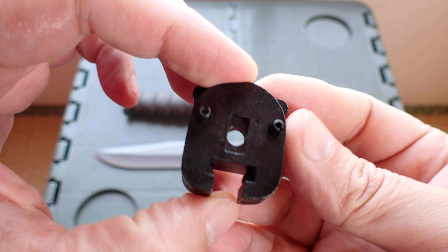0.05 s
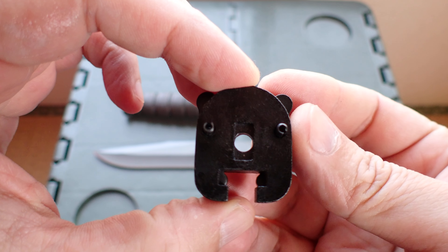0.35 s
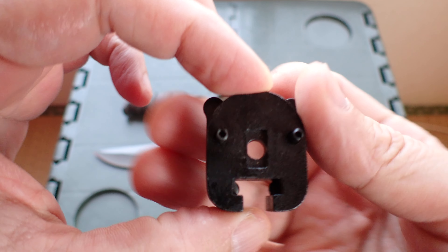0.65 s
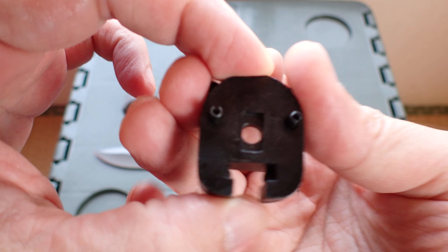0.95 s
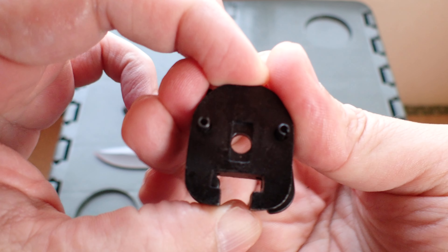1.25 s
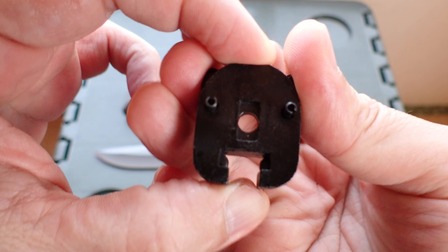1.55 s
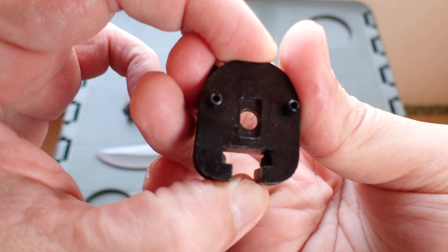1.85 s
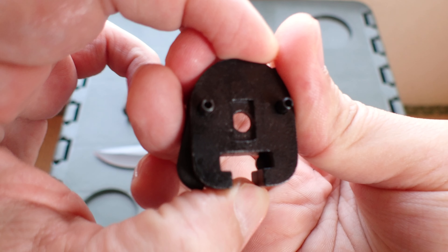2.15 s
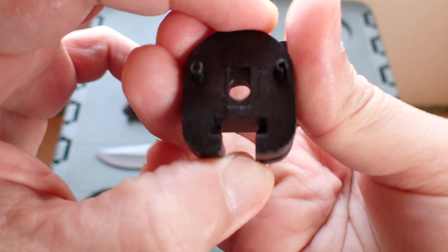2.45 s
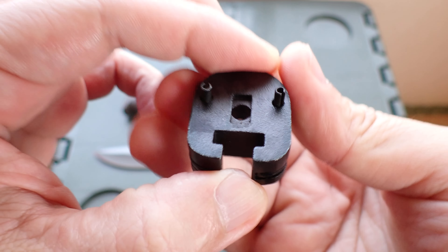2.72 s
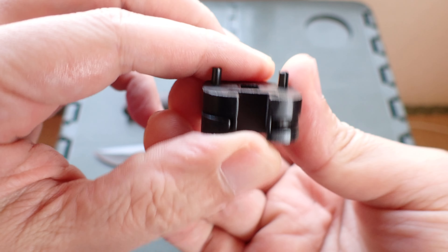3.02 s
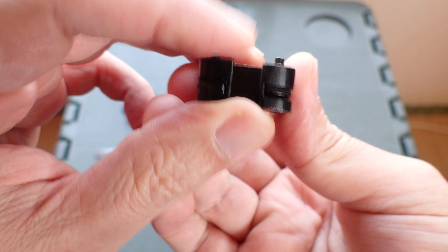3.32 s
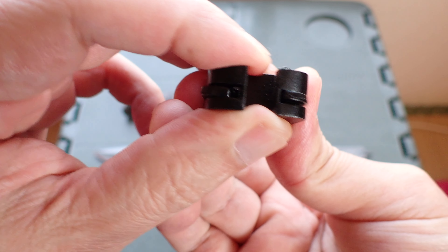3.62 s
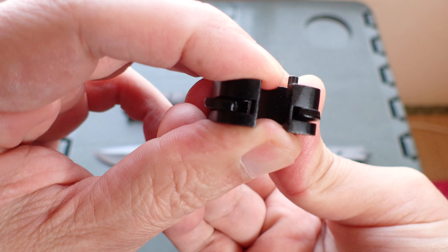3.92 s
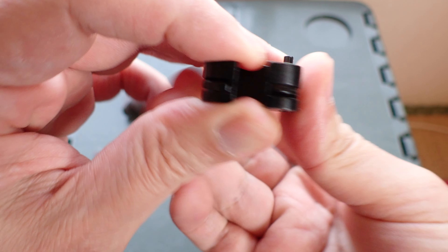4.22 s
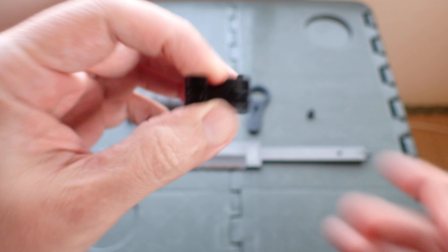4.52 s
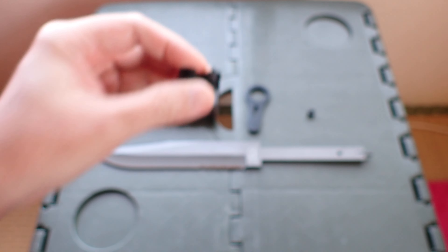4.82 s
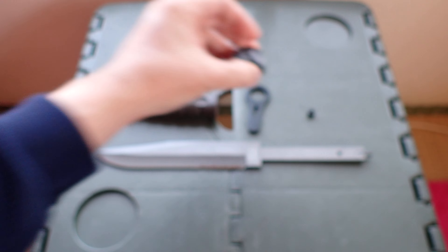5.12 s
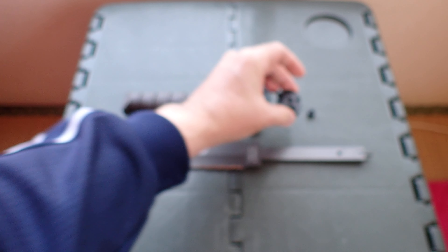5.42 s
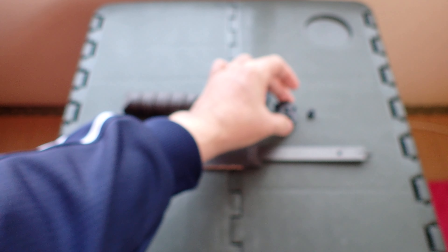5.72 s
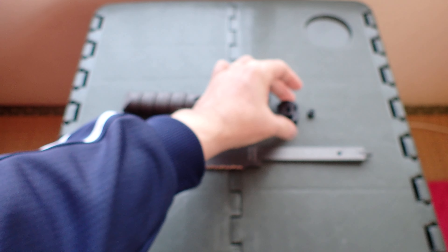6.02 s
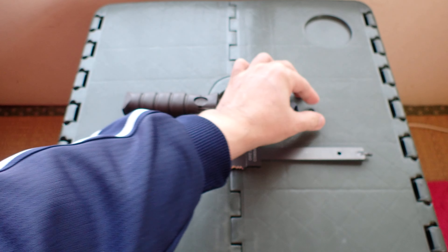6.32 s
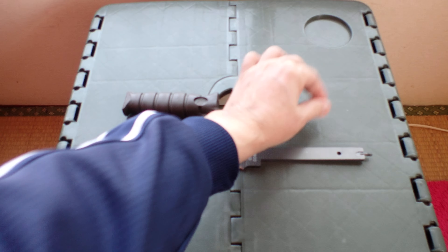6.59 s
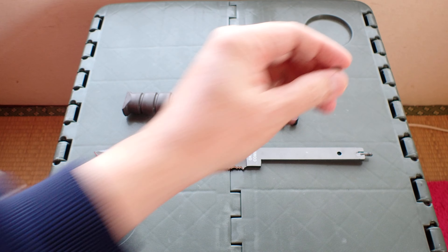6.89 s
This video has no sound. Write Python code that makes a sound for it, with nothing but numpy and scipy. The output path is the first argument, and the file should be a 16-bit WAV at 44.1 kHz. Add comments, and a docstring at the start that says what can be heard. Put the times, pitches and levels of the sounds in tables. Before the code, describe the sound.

In a quiet room with microphone hiss and a camera's faint focus buzz, fingers turn a small metal part close to the microphone. Skin rubs softly while the loose halves clink and snap together. A sleeve then swishes forward and the part is knocked down on a hollow plastic board a little farther off. It chatters briefly, is nudged and scrapes to rest.

```python
"""First comes a quiet room with microphone hiss, and the faint stepping buzz of a camera's focus motor. Close
by, fingers turn a small metal part: the loose halves clink and snap together. A sleeve swishes forward and the
part is knocked down on a hollow plastic board, which rings. The part chatters as it bounces, is nudged twice
and scrapes to rest."""
import sys
import numpy as np
from scipy import signal
from scipy.fft import rfft, irfft
from scipy.io import wavfile

SR = 44100
rng = np.random.default_rng(int(sys.argv[2]) if len(sys.argv) > 2 else 0)


def inscribe(sig):
    """Save sig as 16-bit PCM at rate SR to the path in sys.argv[1].

    A 1-D sig is mono; a 2-D sig holds one channel per row.
    Samples are clipped to [-1, 1] before scaling.
    """
    pcm = np.round(np.clip(np.atleast_2d(sig).T, -1, 1) * 32767)
    wavfile.write(sys.argv[1], SR, pcm.astype(np.int16))


N = 306477

# the board's natural tones: pitch_hz, level_db, ring_s (time to fade by 60 dB)
BOARD_TONES = [(236.5, 6.5, 0.11), (290.7, -3.5, 0.34), (342, -2, .17), (417, -11, 0.1),
               (569.5, -11.5, 0.2), (624, -9.5, 0.19), (660, -10, 0.13), (705, -11.5, 0.07),
               (860, -11.5, 0.068), (1028, -1, 0.054), (1113, -7, 0.043), (1236, -18, 0.091),
               (1340, -17, 0.12), (1390, -15, 0.11), (1840, -16, 0.022), (2140, -26, 0.047),
               (2910, -14.5, 0.081), (3290, -4, 0.01), (4190, -7, 0.019)]


def amp(db):
    """Turns decibels into a gain."""
    return 10 ** (np.asarray(db) / 20)


def unit(x):
    """Scales a sound to an average (rms) level of 1."""
    return x / np.sqrt(np.mean(x ** 2) + 1e-20)


def read(points, hz):
    """Reads between a table's rows on a musical pitch scale."""
    f, value = np.transpose(points)
    return np.interp(np.log(hz + 1), np.log(f + 1), value)


def add(mix, start_s, sound):
    """Mixes a sound in at its start time."""
    part = mix[..., round(start_s * SR):][..., :sound.shape[-1]]
    part += sound[..., :part.shape[-1]]


def colour(x, gain):
    """Turns each frequency up or down by gain(hz)."""
    return irfft(rfft(x) * gain(np.fft.rfftfreq(x.shape[-1], 1 / SR)), x.shape[-1])


def cut(x, hz, kind, order=2):
    """Keeps the "low", "high" or "band" part of a sound."""
    return signal.sosfilt(signal.butter(order, hz, kind, fs=SR, output="sos"), x)


def band(x, low_hz, high_hz):
    """Gently fades what lies below low_hz and above high_hz."""
    return cut(cut(x, low_hz, "high"), high_hz, "low")


def ring(hz, ring_s, t):
    """One fading tone."""
    return np.sin(2 * np.pi * hz * t) * 1000 ** (-t / ring_s)


def burst(fade_s, t):
    """Fading noise, different left and right."""
    return rng.standard_normal((2, len(t))) * 1000 ** (-t / fade_s)


def pan(left_db):
    """Two gains that make the left side louder by left_db."""
    return amp(np.array([[.5], [-.5]]) * left_db)


def background(rumble_db=-51, hiss_db=-55.1):
    """The room rumbles softly and the two microphones add their own hiss."""
    # the tone colour of each noise: pitch_hz, level_db
    rumble_shape = [(12, -56), (20, -8), (32, -23), (51, -8), (75, -3.5), (181, -3), (212, -3), (353, -6),
                    (413, -7), (513, -8.5), (601, -10), (823, -10.5), (2200, -24.5), (2860, -33.5),
                    (4840, -120)]
    hiss_shape = [(1500, -30), (2300, -16), (3400, -13.5), (3980, -19), (4300, -14), (4900, -13),
                  (5500, -6.5), (6600, -6.5), (7700, 0), (8600, -3), (9200, -11), (10200, -9), (15800, -10)]
    # how alike the two sides are: pitch_hz, likeness (0 to 1)
    likeness = [(30, 0.22), (70, 0.24), (140, 0.3), (300, 0.12), (700, 0.057), (1500, 0.28), (3000, 0.2),
                (8000, 0.073), (15000, 0.03)]
    # how much louder the left side is: pitch_hz, left_db
    balance = [(60, -2.5), (110, 5), (200, 1.5), (380, 4), (700, 1), (1290, 6), (2380, 1), (4400, 5.5),
               (8120, 2), (15000, 2)]
    left, other = rng.standard_normal((2, N))
    shared = lambda f: read(likeness, f)
    right = colour(left, shared) + colour(other, lambda f: np.sqrt(1 - shared(f) ** 2))
    pair = np.array([left, right])
    layer = lambda shape: unit(colour(pair, lambda f: amp(read(shape, f)) * pan(read(balance, f))))
    hiss = layer(hiss_shape)
    return amp(rumble_db) * layer(rumble_shape) + amp(hiss_db) * hiss / np.std(hiss.mean(0))


def focus_motor(steps_per_s=45, step_s=0.025, uneven_db=3.5, weak_db=-4):
    """The lens moves in short steps, every third one stronger, each a soft buzz in its housing."""
    # the motor's runs: start_s, end_s, level_db
    runs = [(0.403, .85, -60), (1.267, 2.72, -59.5), (3.871, 4.38, -58.5), (5.837, 6.36, -59.5),
            (6.702, 6.86, -61.5)]
    # where the housing rings: pitch_hz, width_hz, level_db
    peaks = [(3107, 300, 10.5), (4700, 1800, 2.5)]
    steps = np.zeros(N)
    for start_s, end_s, db in runs:
        for k, time_s in enumerate(np.arange(start_s, end_s, 1 / steps_per_s)):
            weak = k % 3 > 0
            step_db = db + weak * weak_db + uneven_db * rng.standard_normal()
            add(steps, time_s, amp(step_db) * np.hanning(round(step_s * SR)))
    housing = lambda f: sum(amp(db) / (1 + (2 * (f - hz) / width) ** 2) for hz, width, db in peaks)
    return steps * unit(colour(rng.standard_normal((2, N)), housing)) * pan(0.73)


def swish(shape, peak_s, rise_db_per_s, fall_db_per_s, catch_db, catch_hz, likeness):
    """Soft surfaces rub in one swell of noise, catching unevenly."""
    since = np.arange(N) / SR - peak_s
    swell_db = np.minimum(rise_db_per_s * since, -fall_db_per_s * since)
    catching = unit(colour(rng.standard_normal(N), lambda f: np.exp(-(f / catch_hz) ** 2)))
    grain = likeness * rng.standard_normal(N) + (1 - likeness) * rng.standard_normal((2, N))
    rub = unit(colour(grain, lambda f: amp(read(shape, f))))
    return rub * amp(swell_db + catch_db * catching)


def fingertips(level_db=-60):
    """Skin creeps over the metal, loudest while it presses the halves together."""
    # the tone colour of rubbing skin: pitch_hz, level_db
    skin = [(120, 0), (300, 13), (600, 0), (1300, 0), (2400, -14), (3700, -14), (4600, 0), (7500, -3),
            (10000, -12), (15000, -18)]
    rub = swish(skin, peak_s=1.6, rise_db_per_s=14, fall_db_per_s=14,
                catch_db=3, catch_hz=60, likeness=.55)
    return amp(level_db) * rub * pan(3)


def clinks(crack_s=0.088, bounce_s=0.001044, bounce_db=-5):
    """The halves touch twice in a flash and ring; the spot struck decides which tones stand out."""
    # the part's natural tones: pitch_hz, ring_s, rim_db, corner_db, face_db, pin_db
    metal_tones = [(2160, 0.26, -42, -35, -40, -6), (2880, 0.075, -16, -24, -35, -22),
                   (4190, 0.15, -30, -32, -27, -6), (4440, 0.058, 3, -20, -16, -10),
                   (4680, 0.1, -17, -13, -8, 1), (4940, 0.11, -24, -21, 1, -7),
                   (5170, 0.46, -38, -30, -2, -26), (7740, 0.1, 5, -8, 2, -6), (8190, .1, -24, -24, 4, -14),
                   (8670, 0.087, -28, -26, 0, -20), (10080, 0.05, -24, -1, -40, -27),
                   (10610, 0.08, -13, -27, -32, -20), (11435, 0.42, -18, -24, -33, -32),
                   (13050, 0.14, -21, -25, -19, -30), (13500, 0.13, -24, -14, -31, -26),
                   (15000, .045, -18, -10, -26, -20)]
    # the names of those four spots, in the same order
    spots = ["rim", "corner", "face", "pin"]
    # the touches: start_s, level_db, spot, ring_factor, crack_db
    touches = [(1.039, -42, "rim", 0.8, -4), (1.160, -41, "face", 0.39, -8),
               (1.9594, -29.5, "corner", 1, -12), (1.992, -20.5, "rim", 0.78, -11.5),
               (2.221, -39, "pin", 1, -9), (4.2025, -29.5, "face", 0.7, -11)]
    out, t = np.zeros((2, N)), np.arange(SR // 3) / SR
    for start_s, db, spot, ring_factor, crack_db in touches:
        tone = sum(amp(spot_db[spots.index(spot)]) * ring(hz, ring_s * ring_factor, t)
                   for hz, ring_s, *spot_db in metal_tones)
        crack = amp(crack_db) * band(burst(crack_s, t), 3800, 10700)
        add(out, start_s, amp(db) * (tone / abs(tone).max() + crack))
        tick = band(burst(0.027, t), 7800, 6900)
        add(out, start_s + bounce_s, amp(db + bounce_db) * tick)
    return cut(out, 2600, "high") * pan(4.3)  # the clinks keep little below 2.6 kHz


def snaps(low_ring_s=0.015, high_ring_s=0.0085, crack_db=-9, crack_s=0.011, after_s=0.45):
    """Pinched metal slips and stops dead: two very short tones, a crack and a faint after-ring."""
    # slips choked by the fingers: start_s, level_db, low_hz, high_hz, high_db, ring_factor, after_db
    slips = [(1.0407, -34, 1860, 7600, 12, 2.7, -18), (1.496, -38, 4800, 7800, 4, .7, -14),
             (1.513, -38, 4700, 7800, -6, .8, -19), (1.518, -24, 5230, 7700, 4, 0.59, -29),
             (1.556, -40, 4940, 7800, 6, 1.5, -16), (2.4364, -14.5, 4800, 14100, 10.5, 0.32, -33),
             (3.498, -49, 4470, 7800, -10, 1.5, -25), (4.1456, -21.5, 4400, 8400, 9, 0.83, -26),
             (4.147, -23.5, 4130, 7540, 29, 0.58, -30)]
    out, t = np.zeros((2, N)), np.arange(SR // 6) / SR
    for start_s, db, low_hz, high_hz, high_db, ring_factor, after_db in slips:
        tone = ring(low_hz, low_ring_s * ring_factor, t)
        tone += amp(high_db) * ring(high_hz, high_ring_s * ring_factor, t)
        crack = amp(crack_db) * band(burst(crack_s, t), 4000, 12000)
        after_ring = amp(after_db) * band(burst(after_s, t), 3200, 10600)
        add(out, start_s, amp(db) * (tone / abs(tone).max() + crack + after_ring))
    return cut(out, 2000, "high") * pan(3.7)


def sleeve(level_db=-51):
    """Cloth rubs on cloth as the arm reaches out, loudest when the arm is fastest."""
    # the tone colour of rubbing cloth: pitch_hz, level_db
    cloth = [(150, -3), (400, 6.5), (850, -1), (1400, -1.5), (2300, -9.5), (3800, -9.5), (4700, -0.5),
             (6800, -4.5), (8200, -5), (15000, -32)]
    rub = swish(cloth, peak_s=4.76, rise_db_per_s=31, fall_db_per_s=16.5,
                catch_db=-1.5, catch_hz=25, likeness=0.53)
    return amp(level_db) * rub * pan(2.9)


def bounces(chatter_s, swing_s=.00418, uneven_s=0.00043,
            drop_db=-7.5, fade_db_per_s=-25, uneven_db=6.9, soften=0.59):
    """The board throws the part back; it lands two or three swings later, duller and mostly weaker."""
    swings = rng.permuted(np.tile([2, 3], (6, 1)), axis=1).ravel()
    delays = np.cumsum(swing_s * swings + uneven_s * rng.standard_normal(len(swings)))
    levels = drop_db + fade_db_per_s * delays + uneven_db * rng.standard_normal(len(delays))
    first_blow = (0.00094, 0, 1)  # delay_s, level_db, treble_factor
    return [first_blow] + [(delay, db, soften) for delay, db in zip(delays, levels) if delay < chatter_s]


def knocks(clatter_db=-12, clatter_s=0.29, crack_db=-1, crack_s=0.024,
           rattle_hz=5400, buzz_db=-20, buzz_s=0.72):
    """Each blow and bounce makes the board ring; soft blows lack treble, light ones lack bass."""
    # blows on the board: start_s, level_db, treble_cut_hz, bass_cut_hz, ring_factor, chatter_s
    blows = [(5.659, -45, 815, 300, 0.52, 0), (5.7099, -22.5, 2220, 192, 0.74, .058),
             (5.7737, -33, 1290, 330, 0.99, .024), (5.847, -35.5, 280, 100, 0.51, 0),
             (5.8543, -34, 560, 160, 0.37, .055), (6.039, -33, 224, 100, 0.31, 0),
             (6.046, -28.5, 970, 148, 0.65, .014), (6.457, -30.5, 1800, 1540, 1.3, .014),
             (6.528, -34.5, 1640, 1120, 1, 0), (6.5322, -32, 290, 100, 0.87, .014),
             (6.5492, -33.5, 1130, 250, 0.63, 0), (6.62, -47, 980, 800, 0.32, 0),
             (6.6459, -26, 4170, 2980, 0.11, 0), (6.652, -39, 5000, 1400, 0.15, 0)]
    out, t = np.zeros((2, N)), np.arange(SR // 2) / SR
    for start_s, db, treble_cut_hz, bass_cut_hz, ring_factor, chatter_s in blows:
        tone = sum(amp(tone_db) * ring(hz, ring_s * ring_factor, t)
                   for hz, tone_db, ring_s in BOARD_TONES)
        for delay_s, drop_db, treble_factor in bounces(chatter_s):
            top_hz = treble_cut_hz * treble_factor
            # noise stands for the board's many weak higher tones
            clatter = amp(clatter_db) * burst(clatter_s * ring_factor, t)
            crack = amp(crack_db) * burst(crack_s, t)
            blow = band(tone + band(clatter + crack, 650, rattle_hz), bass_cut_hz, top_hz)
            # the metal buzzes against the plastic, more after a hard blow
            hardness = min(top_hz / 2000, 1)
            buzz = amp(buzz_db) * hardness * band(burst(buzz_s * ring_factor, t), 2100, rattle_hz)
            add(out, start_s + delay_s, amp(db + drop_db) * (blow + buzz))
    # a small plastic board gives off little bass and muffles the top
    return cut(out, [195, 6200], "band", order=4) * pan(4.1)


def scrape(start_s=6.617, end_s=6.659, edge_s=0.0024,
           start_db=-51, growth_db_per_s=90, slips_per_s=1400, ring_factor=0.24):
    """Pushed ever harder until it catches, the metal crosses the rough plastic in tiny slips."""
    # how strongly the sliding edge shakes the board: pitch_hz, level_db
    contact = [(250, -37.5), (650, -22), (860, -1.5), (1020, -14), (1400, -23), (2130, 4), (2700, -6),
               (3350, 0), (4300, -3), (6500, -20)]
    t, since = np.arange(SR // 10) / SR, np.arange(N) / SR - start_s
    slips = rng.standard_normal(N) * (rng.random(N) < slips_per_s / SR)
    board = sum(amp(db) * ring(hz, ring_s * ring_factor, t) for hz, db, ring_s in BOARD_TONES)
    rub = colour(signal.oaconvolve(slips, board)[:N], lambda f: amp(read(contact, f)))
    length_s = end_s - start_s
    moving = np.clip(np.minimum(since, length_s - since) / edge_s, 0, 1)
    pressing = amp(start_db + growth_db_per_s * np.clip(since, 0, length_s))
    return unit(rub) * moving * pressing * pan(1.9)


def room_echo(x, delay_s=0.00076):
    """A small furnished room adds a smooth echo whose bass and top die first."""
    # how long the echo lasts: pitch_hz, fade_s
    fade_times = [(200, 0.21), (1000, 0.7), (4000, 0.72), (12000, 0.36)]
    hz, t, noise = signal.stft(rng.standard_normal((2, SR // 2)), SR, nperseg=256)
    fading = amp(-60 * t / read(fade_times, hz)[:, None])
    tail = signal.istft(noise * fading, SR)[1]
    tail[:, :round(delay_s * SR)] = 0
    tail /= np.linalg.norm(tail[0])
    return signal.fftconvolve(x.mean(0)[None], tail, axes=1)[:, :N] * pan(2.7)


def scene(near_echo_db=-17, board_echo_db=-12):
    """The fingers are close, with little echo; the board, an arm's length away, has more."""
    near = clinks() + snaps()
    board = knocks() + scrape()
    echo = room_echo(amp(near_echo_db) * near + amp(board_echo_db) * board)
    return near + board + echo + sleeve() + focus_motor() + background()


def record(dry, top_hz=15900):
    """Removes the very highest treble."""
    treble_cut = signal.firwin(511, top_hz, window=("kaiser", 9), fs=SR)
    return signal.oaconvolve(dry, treble_cut[None], "same")


dry = scene()
out = record(dry)
inscribe(out)
```